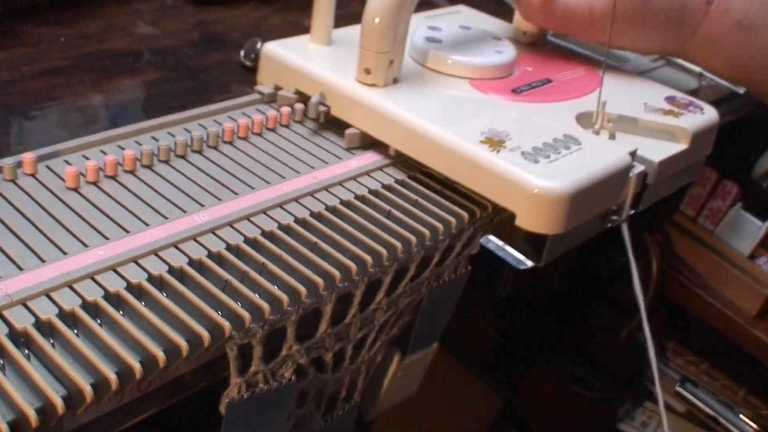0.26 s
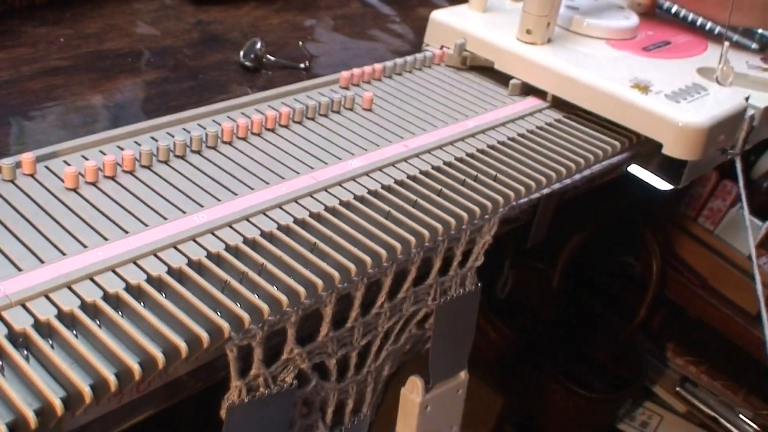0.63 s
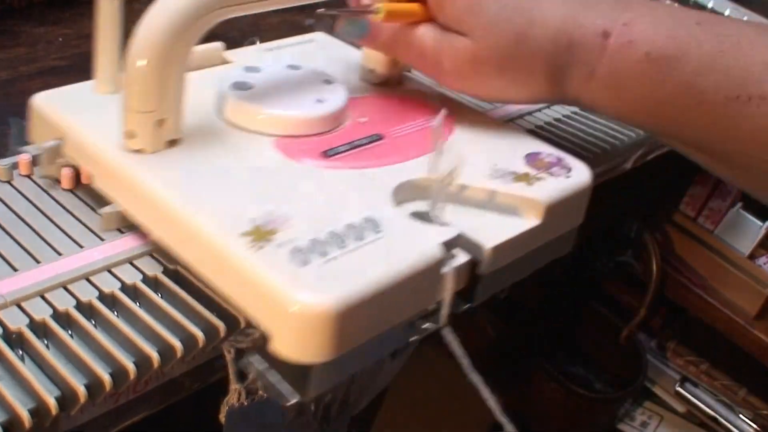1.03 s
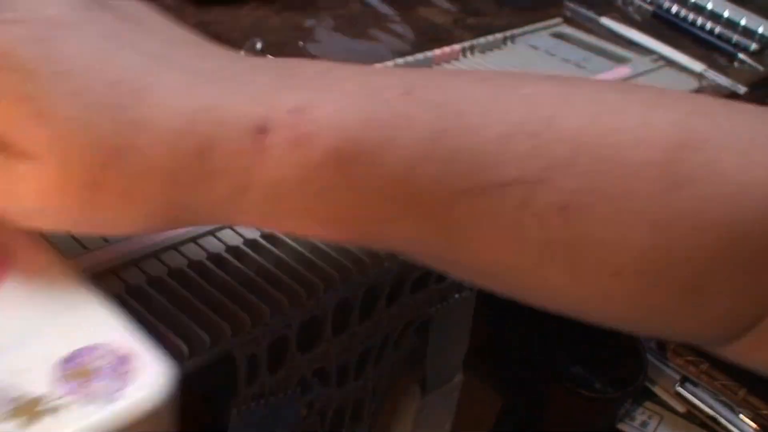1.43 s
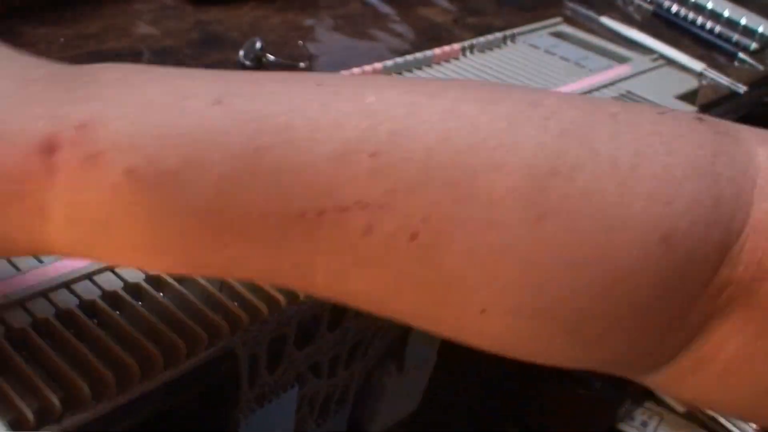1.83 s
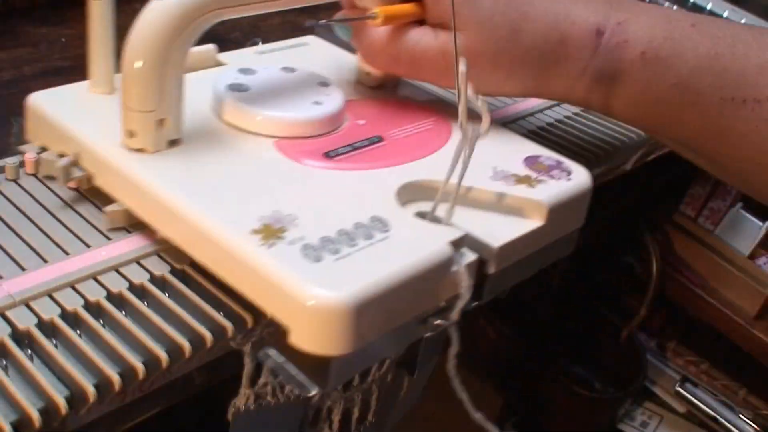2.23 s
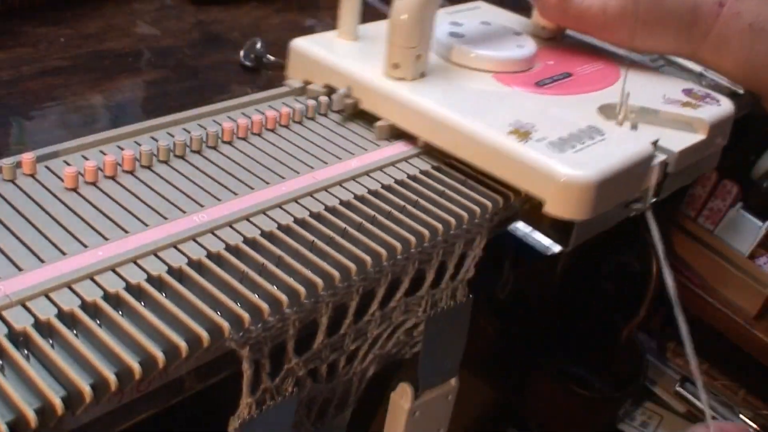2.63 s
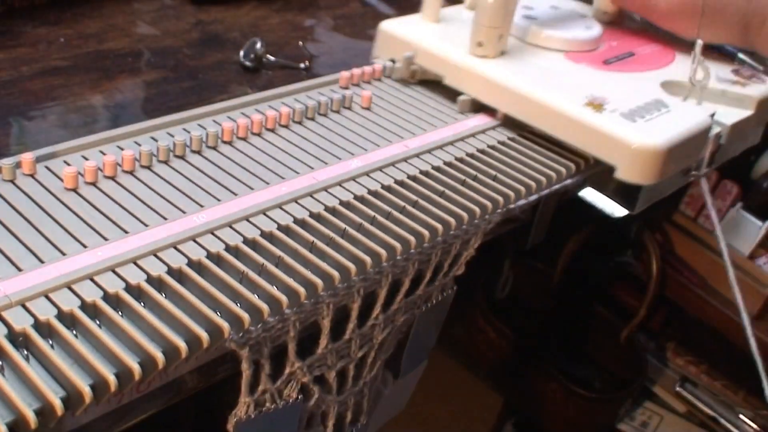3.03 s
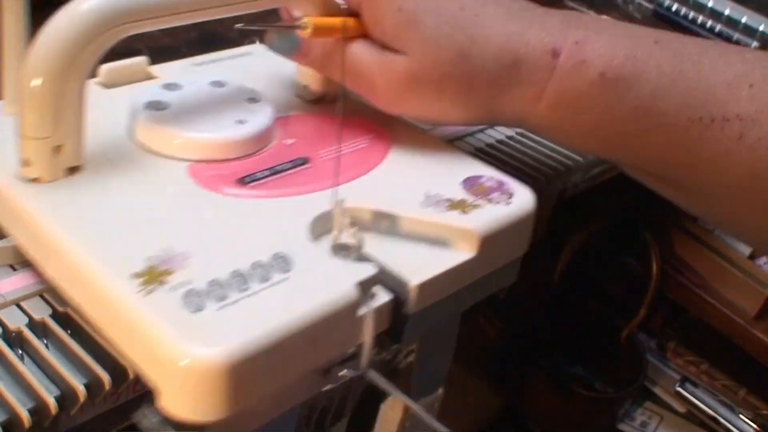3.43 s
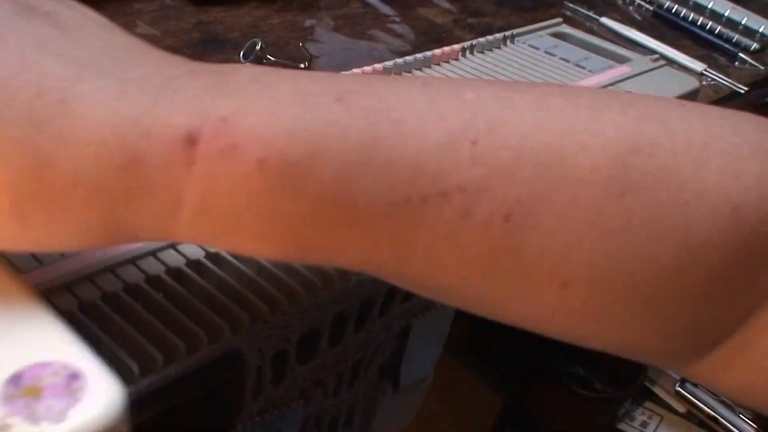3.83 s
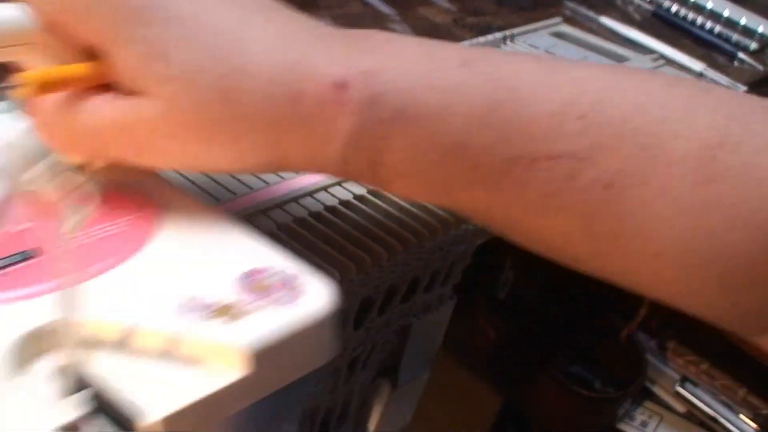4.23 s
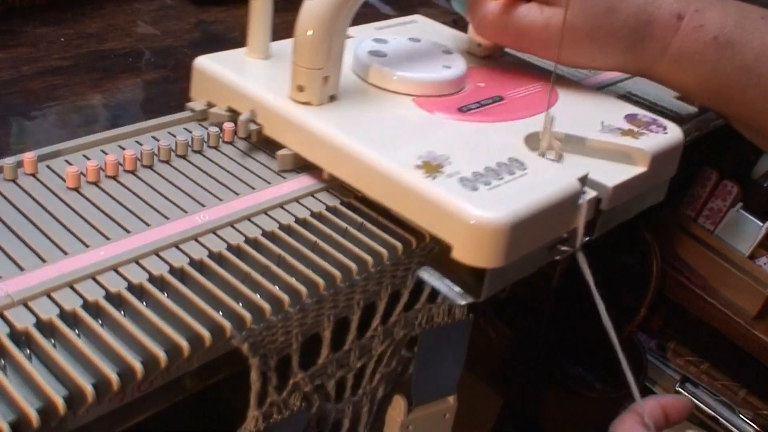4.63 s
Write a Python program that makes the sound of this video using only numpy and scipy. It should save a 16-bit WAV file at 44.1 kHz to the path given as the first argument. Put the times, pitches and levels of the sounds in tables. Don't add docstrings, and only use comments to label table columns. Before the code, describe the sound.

Close stereo microphones in a small quiet room catch a hollow plastic carriage pushed across a knitting machine's steel needles. A stroke already under way ends in a clunk, then a near-quiet rest; the carriage rattles back, clunks and settles, crosses again, pauses briefly, makes a shorter pass, rests and starts a last one. Needle knocks blur into clatter over low bed rumble, with thin metallic rings.

```python
import sys
import numpy as np
from scipy import signal
from scipy.fft import rfft, irfft
from scipy.io import wavfile
from scipy.ndimage import uniform_filter1d

SR = 44100
rng = np.random.default_rng(int(sys.argv[2]) if len(sys.argv) > 2 else 0)


def file_out(sig):
    cols = np.atleast_2d(sig).T
    lim = np.clip(cols, -1, 1)
    pcm = np.round(lim * 32767).astype(np.int16)
    wavfile.write(sys.argv[1], SR, pcm)


def how_loud(loudness_db):
    steps = np.asarray(loudness_db, float) / 20
    return 10 ** steps


N = 210665

# pitch_hz, level_db
SHELL = [(210, -47), (350, -17.5), (846, -5), (1790, 4), (2540, -2.5), (3380, -3), (4500, -11.5),
         (5230, -8), (9000, -25), (11700, -30), (19800, -120)]
# pitch_hz, level_db
STEEL = [(1760, 47), (3000, -1.5), (4690, -4), (5260, -3.5), (6370, -4), (8580, 3.5), (10500, -8.5),
         (12900, -8.5), (14700, -30), (15800, -40), (16400, -59)]
# pitch_hz, level_db
BED = [(18, -59), (30, -10.5), (145, -8), (227, -15.5), (264, -6.5), (349, -12), (401, -3), (590, -10),
       (1200, -30.5), (1560, -17), (2640, -120)]


def evened(x):
    return x / np.sqrt(np.mean(x ** 2, axis=-1, keepdims=True) + 1e-20)


def read(points, hz):
    f, value = np.transpose(points)
    return np.interp(np.log(hz + 1), np.log(f + 1), value)


def curve(rows, column):
    columns = np.transpose(rows)
    return np.interp(np.arange(N) / SR, columns[0], columns[column])


def add(mix, s, sound):
    part = mix[round(s * SR):][:len(sound)]
    part += sound[:len(part)]


def colour(x, points):
    size = x.shape[-1]
    gain = how_loud(read(points, np.fft.rfftfreq(size, 1 / SR)))
    return irfft(rfft(x) * gain, size)


def resonate(x, hz, width):
    return signal.lfilter(*signal.iirpeak(hz, hz / width, SR), x)


def ringing(hz, mode_hz, sharp):
    drag = 1j * hz / mode_hz / sharp
    return drag / (1 - (hz / mode_hz) ** 2 + drag)


def bodies(points, sharp, spread_db, count, size=4096):
    hz = np.fft.rfftfreq(size, 1 / SR)
    place = rng.random((count, 24, 3))
    low, high = points[1][0], points[-2][0]
    modes = low + (high - low) * ((np.arange(24) + place[..., 0]) / 24) ** 1.486
    level_db = read(points, modes) + spread_db * (place[..., 1] - .5)
    height = how_loud(level_db) * np.sign(place[..., 2] - .5)
    return sum(height[:, k, None] * ringing(hz, modes[:, k, None], sharp) for k in range(24))


def needle_rows():
    # first_s, last_s, first_peak_db, last_peak_db
    runs = [(0.01, 0.076, -14, -19), (.1037, 0.2093, -11, -11.5), (0.2263, 0.289, -13.5, -4),
            (0.843, 0.9484, -11, -17), (.961, 0.999, -20, -6), (1.01, 1.0727, -30, 2),
            (1.084, 1.169, -17.5, -4), (1.182, 1.292, -17, -20.5), (2.0218, 2.121, -3, -3),
            (2.13, 2.217, -5.5, -20), (2.2425, 2.34, -18, -8), (2.362, 2.4868, -12.5, -15.5),
            (2.5222, 2.5836, -15, -7.5), (3.127, 3.2168, -12.5, -3), (3.217, 3.296, 0, -26),
            (3.31, 3.3824, -13.5, -7.5), (3.4013, 3.453, -6.5, -8), (3.4713, 3.5703, -12, -6),
            (4.228, 4.3296, -12, -1), (4.349, 4.454, -19, -6), (4.47, 4.588, -11.5, -9),
            (4.604, 4.6873, -8.5, -14), (4.7003, 4.728, -31, -15)]
    needles_in_run = [5, 5, 4, 11, 4, 4, 7, 7, 10, 6, 6, 6, 4, 10, 7, 4, 4, 6, 10, 8, 8, 5, 4]
    uneven_db, early_late_s, idle_db = 2.5, .0008, -4.5
    chatter_db = 31
    rows = []
    for (first, last, first_db, last_db), count in zip(runs, needles_in_run):
        luck = rng.standard_normal((count, 4))
        gap_ms = 1000 * (last - first) / (count - 1)
        s = np.linspace(first, last, count) + early_late_s * luck[:, 0]
        db = np.linspace(first_db, last_db, count) + uneven_db * luck[:, 1]
        db = db + idle_db * (np.arange(count) % 2)
        bright_db = -18 + 0.6614 * gap_ms - 1.5 * luck[:, 2]
        note_hz = 1780 * np.exp(0.021 * gap_ms * np.clip(luck[:, 3] + 0.13, -1, 2))
        rows += [(*row, chatter_db / gap_ms) for row in zip(s, db, bright_db, note_hz)]
    return rows


def knocks(rows, note_db):
    s, db, bright_db, note_hz, dying = np.transpose(rows)[..., None]
    ms, count = np.arange(1536) / SR * 1000, len(s)
    luck = rng.standard_normal((count, 1536, 2))
    fading_db = -np.clip(dying, .45, 9) * ms
    onset = np.minimum(ms / 1.14, 1)
    chatter = how_loud(fading_db + 3.44 * luck[..., 1]) * onset * luck[..., 0]
    soft = signal.lfilter(*signal.butter(2, 6500, fs=SR), chatter)
    note = how_loud(note_db) * ringing(np.fft.rfftfreq(2048, 1 / SR), note_hz, 6.4)
    shell_body = note + bodies(SHELL, 6.6, 8.1, count, size=2048)
    shell = irfft(rfft(soft, 2048) * shell_body)
    steel_body = bodies(STEEL, 29.6, 2.9, count, size=2048)
    steel = irfft(rfft(chatter * how_loud(-.7 * ms), 2048) * steel_body)
    shell, steel = (v / abs(v).max(1, keepdims=True) for v in (shell, steel))
    sounds = how_loud(db - 3.5) * (shell + how_loud(bright_db + 7.0) * steel)
    out = np.zeros(N)
    for at, sound in zip(s[:, 0], sounds):
        add(out, max(at - .0008, 0), sound)
    return out


def clunk_rows():
    # start_s, peak_db, steel_brightness_db, shell_note_hz
    far_turn = [(0.3417, -2, -11.5, 3780), (0.3956, -11.5, -14, 3660), (.4124, -17.5, -32, 2200),
                (.7045, -21, -20, 2640), (0.722, -24, 4, 1400), (0.7377, -20, -8, 4350),
                (0.75, -20.5, 1, 2700), (.7633, -12.5, -5.5, 2570), (0.7825, -14.5, 0.5, 1500),
                (0.795, -21, .5, 2520), (2.603, -3, -6.5, 1600), (2.6183, -5.5, -6.5, 2630),
                (2.6723, 0.5, -13.5, 1600), (2.735, -11.5, -43, 3520), (2.769, -20, -30, 1410),
                (2.7864, -38, -2, 3700), (2.8654, -30, -8, 1230), (2.934, -31, -28, 1210),
                (3.0303, -28.5, -16, 1824), (3.0813, -22.5, -17, 1330), (4.7602, -2, -8, 1590)]
    near_turn = [(1.3307, -2.5, -14, 1940), (1.376, -10, -3, 1870), (1.3916, 0.5, -30, 1950),
                 (1.4433, -18, -27, 3800), (1.465, -18.5, -30, 1760), (1.5125, -23.5, -26, 1310),
                 (1.5764, -13.5, -29, 3800), (1.596, -18, -37, 1560), (1.6345, 0.5, -22.5, 1510),
                 (1.727, -25, -35, 1390), (1.7785, -16, -34, 1720), (1.8604, -17.5, -12.5, 1570),
                 (1.8965, -8.5, -40, 1780), (1.952, -22, -25, 4360), (1.9844, -13, -12, 3790),
                 (1.9935, -3, -13.5, 1290), (3.5979, -11, -6.5, 2200), (3.6185, 0, -10, 1820),
                 (3.6355, -4.5, -9, 1160), (3.6623, -16.5, -14, 1740), (3.8215, -13.5, -40, 3900),
                 (3.866, -22.5, -13, 3370), (3.9838, -26, -12, 1700), (4.0921, -20.5, -35, 1640),
                 (4.155, -31, -10, 1180)]
    settling = [(0.487, -42, 8, 1750), (.624, -40, -3, 960), (1.6269, -8.5, -23, 1810),
                (1.709, -36, -28, 1940), (1.916, -19.5, -24, 1220), (2.9596, -45, -7, 1280),
                (3.8147, -18, -18, 1260), (3.926, -34, -19, 1940), (4.0164, -30.5, -14, 1180),
                (4.0566, -28, -35, 1780), (4.115, -20.5, -40, 1780)]
    snaps = [(.593, -26.5, -21, 1440), (0.6827, -24.5, 7.5, 1510), (0.8247, -5, -5, 2690),
             (1.3096, -2.5, -6.5, 3550), (1.7488, -12, -37, 1670), (2.6546, -9, -5, 2700),
             (3.1177, -1.5, -6, 2170), (3.695, 3, -18.5, 2000), (4.0793, -12.5, -22, 1740),
             (4.206, -1.5, -17, 1695)]
    far_dies, near_dies, snap_dies = 0.66, 0.82, 2.85
    rows = [(*row, far_dies) for row in far_turn]
    rows += [(*row, near_dies) for row in near_turn + settling]
    return rows + [(*row, snap_dies) for row in snaps]


def rattle_levels(needles):
    # time_s, effort_db
    push = [
        [(0, -22), (.06, -26), (.12, -37), (.33, -28), (.42, -39.5), (.58, -53.5), (.675, -52), (.72, -38),
         (.815, -44)],
        [(.83, -29.5), (.93, -23.5), (1.16, -22.5), (1.37, -26.5), (1.42, -37.5), (1.62, -47.5), (1.67, -35.5),
         (1.84, -43), (1.975, -36.5)],
        [(2.0, -20), (2.05, -23.5), (2.3, -23), (2.6, -28.5), (2.69, -33), (2.85, -54.5), (2.95, -49.5),
         (3.07, -44.5), (3.11, -38)],
        [(3.125, -26), (3.21, -22.5), (3.3, -23), (3.33, -29), (3.46, -18.5), (3.53, -24.5), (3.68, -34),
         (3.75, -39.5), (3.97, -59.5)],
        [(4.06, -48.5), (4.195, -38), (4.21, -25), (4.28, -21.5), (4.4, -20.5), (4.66, -29), (4.78, -26.5)],
    ]
    # start_s, stop_s
    strokes = [
        (-.25, 0.4),
        (0.827, 1.475),
        (1.992, 2.86),
        (3.116, 3.6),
        (4.205, 5.6),
    ]
    surge_db, surge_s, shell_share = 8, 0.016, 0.23
    lag_db, lag_s = -9, 0.032
    leave_s, clear_s, clear_db = 0.23, 0.21, -22
    t, effort_db = np.arange(N) / SR, curve(np.vstack(push), 1)
    struck = np.zeros(N)
    struck[[round(row[0] * SR) for row in needles]] = 1
    bump = np.exp(-(t[:2048] / surge_s) ** 2)
    surge = surge_db * np.minimum(signal.oaconvolve(struck, bump)[:N], 1)
    lag, clear = np.zeros(N), []
    for start, stop in strokes:
        lag += (t > start) * np.exp(-np.maximum(t - start, 0) / lag_s)
        clear += [(start, 0), (stop - leave_s, 0), (stop + clear_s, clear_db)]
    shell_db = effort_db + lag_db * lag + shell_share * surge
    steel_db = -29 + 0.71 * (effort_db + 23.5) + curve(clear, 1) + surge
    return shell_db, steel_db


def rattle(points, sharp, per_s, uneven_db, clump_db):
    clumps = evened(uniform_filter1d(uniform_filter1d(rng.standard_normal(N), 150), 150))
    size_db = uneven_db * np.minimum(rng.exponential(1, N), 4) + clump_db * clumps
    size = how_loud(size_db) * (rng.random(N) < per_s / SR)
    size = size * rng.choice([-1, 1], N)
    part = rng.integers(0, 16, N)
    rings = evened(irfft(bodies(points, sharp, 31.7, count=16))[:, :512])
    return evened(sum(signal.oaconvolve(size * (part == k), ring)[:N] for k, ring in enumerate(rings)))


def carriage(needles):
    # pitch_hz, width_hz, level_db
    needle_modes = [(8660, 90, -1), (9260, 70, -2), (9745, 40, 2), (12893, 35, 0), (14200, 90, -2)]
    shell_db, steel_db = rattle_levels(needles)
    steel = rattle(STEEL, 2.5, 2600, 2.2, 1.1) * how_loud(steel_db)
    rings = sum(how_loud(db) * resonate(steel, hz, width) for hz, width, db in needle_modes)
    shell = rattle(SHELL, 12.8, 1700, 0.38, 0.33) * how_loud(shell_db)
    rumble = evened(colour(rng.standard_normal(N), BED)) * how_loud(0.69 * shell_db - 25.5)
    return steel + rings + shell + rumble


def singing():
    # start_s, pitch_hz, level_db, hold_s, t60_s
    sings = [(1.184, 12893, -29, .032, .04), (.42, 1770, -53, .13, .3), (.49, 560, -47, .012, .05),
             (2.737, 3850, -38, .003, .2), (3.824, 3950, -38, .003, .1), (.4, 3750, -38, .003, .2),
             (3.665, 1860, -33, .02, .1)]
    # pitch_hz, t60_s
    needle_notes = [
        (8640, .03),
        (9745, .13),
        (12893, .18),
    ]
    # start_s, peak_db
    pings = [
        [(0.9482, -7.5), (1.0096, -12), (1.045, -7), (1.064, -14), (1.2406, -9), (1.3763, -16), (2.3171, -8),
         (3.492, -29), (3.5493, -8.5), (3.5703, -13)],
        [(1.0161, -21), (1.1453, -37), (1.2186, -33), (1.2514, -24), (3.3338, -32), (3.4186, -29), (3.491, -22),
         (3.5324, -29)],
        [(1.0251, -35), (1.063, -37), (3.4915, -31), (3.5124, -20)],
    ]
    struck = []
    for (hz, t60), blows in zip(needle_notes, pings):
        struck += [(s, hz, db - 1, 0, t60) for s, db in blows]
    out, t = np.zeros(N), np.arange(SR // 4) / SR
    onset = np.minimum(t / 0.0017, 1)
    for s, hz, db, hold, t60 in sings + struck:
        fading = how_loud(db - 60 * np.maximum(t - hold, 0) / t60)
        add(out, s, fading * onset * np.sin(2 * np.pi * hz * t))
    return out


def thuds():
    # start_s, peak_db
    blows = [(0.096, -32.5), (0.276, -33.5), (0.493, -42.5), (0.893, -57), (1.158, -26.5), (1.631, -22),
             (2.116, -33), (2.369, -36), (2.482, -27), (2.606, -30.5), (3.184, -41), (3.616, -27),
             (4.039, -38.5), (4.29, -31)]
    out, ms = np.zeros(N), np.arange(4096) / SR * 1000
    shakes = evened(colour(rng.standard_normal((len(blows), 4096)), BED))
    shakes = shakes * how_loud(-.8 * ms) * np.minimum(ms / 4, 1)
    for (s, db), shake in zip(blows, shakes):
        add(out, s, how_loud(db + 4.5) * shake)
    return signal.lfilter(*signal.butter(2, 170, "high", fs=SR), out)


def room(x):
    # pitch_hz, t60_s
    decay = [(200, 0.21), (1500, 0.057), (5000, 0.14), (14000, 0.16)]
    taps = np.zeros((2, SR // 2))
    at = np.arange(60, SR // 2 - 20, 20)
    at = at + rng.integers(0, 20, (2, len(at)))
    np.put_along_axis(taps, at, rng.choice([-1., 1.], at.shape), 1)
    hz, t, z = signal.stft(taps, SR, nperseg=128)
    fading = how_loud(-60 * t / read(decay, hz)[:, None])
    tail = signal.istft(z * fading, SR, nperseg=128)[1]
    return signal.fftconvolve(x[None], tail / np.linalg.norm(tail[0]), axes=1)[:, :N]


def hush():
    # pitch_hz, level_db (per Hz)
    air = [(25, 6), (65, -4), (100, 10), (200, 6.5), (400, 3), (1000, -0.5), (1800, -4), (4000, -23),
           (8000, -26), (16000, -25)]
    a, b = colour(rng.standard_normal((2, N)), air)
    return how_loud(-50.5) * evened(np.array([a + 0.26 * b, a - 0.33 * b]))


def scene():
    # time_s, left_minus_right_db
    place = [
        (0.0, -0.5),
        (1.85, 3),
        (2.82, -0.5),
        (3.94, 3),
        (4.78, 0),
    ]
    needles = needle_rows()
    machine = knocks(needles, 12.5) + knocks(clunk_rows(), 11.3)
    machine = machine + carriage(needles) + singing() + thuds()
    sides = how_loud(curve(place, 1) * np.array([[.5], [-.5]]))
    return sides * (machine + how_loud(-8.0) * room(machine)) + hush()


def band_limit(x):
    return signal.sosfilt(signal.butter(12, 16510, fs=SR, output="sos"), x)


def record(dry):
    # pitch_hz, level_db
    apart = [(100, -6), (300, -1), (700, 5.5), (1500, 3.5), (4000, 2.5), (9000, 1.5), (11000, 7),
             (12000, -15)]
    # pitch_hz, level_db
    mic = [(55, -11), (85, 0), (15750, 0), (15950, -40)]
    mid = (dry[0] + dry[1]) / 2
    side = colour((dry[0] - dry[1]) / 2, apart)
    limited = 0.84 * np.tanh(np.array([mid + side, mid - side]) / 0.93)
    return band_limit(colour(limited, mic))


dry = scene()
out = record(dry)
file_out(out)
```